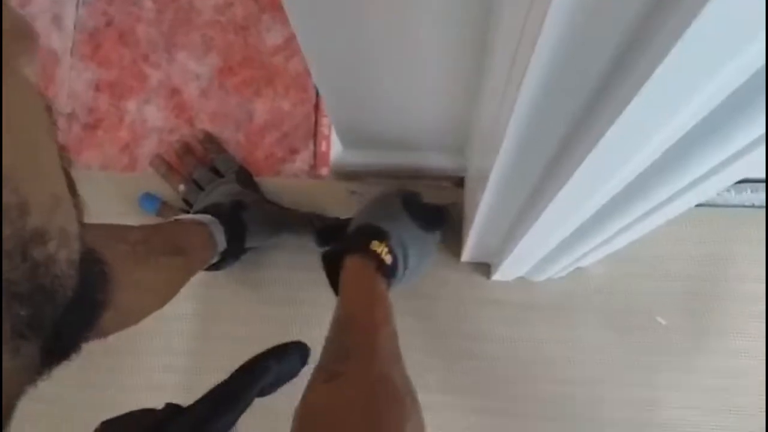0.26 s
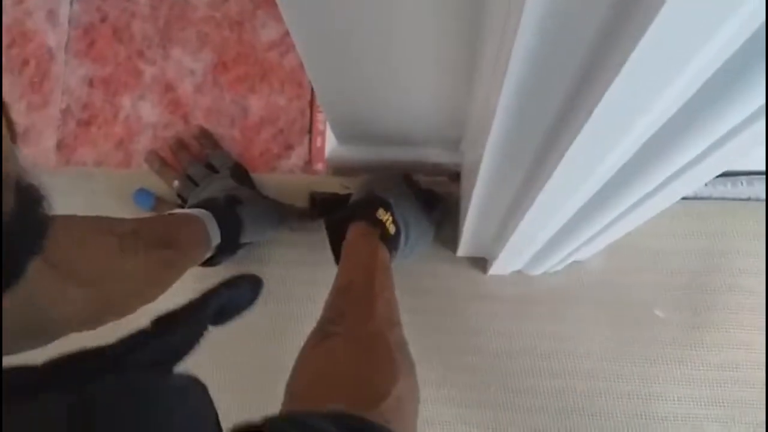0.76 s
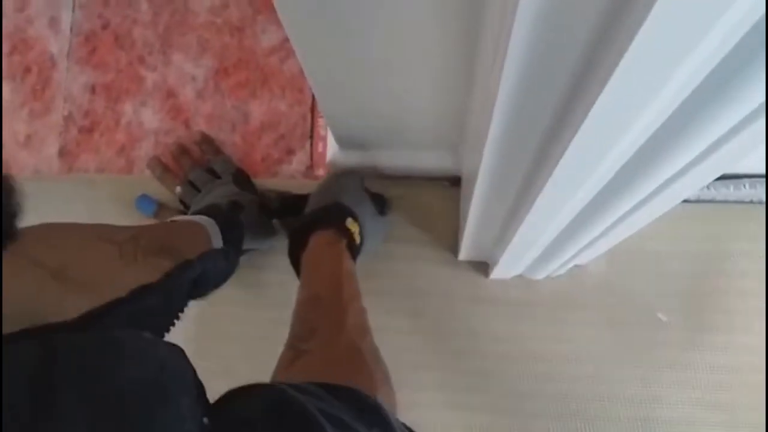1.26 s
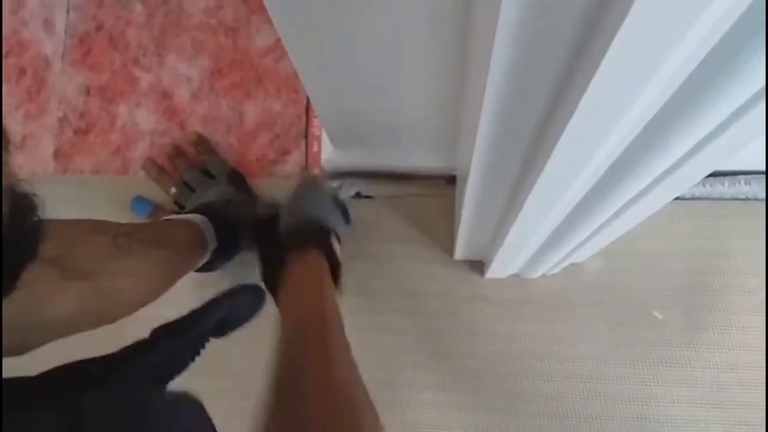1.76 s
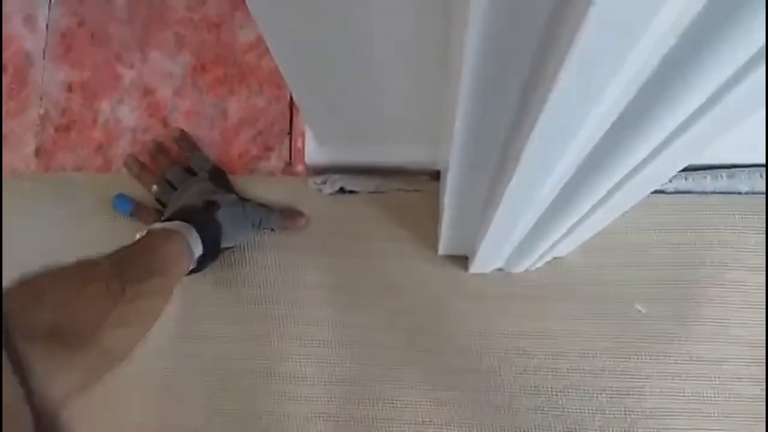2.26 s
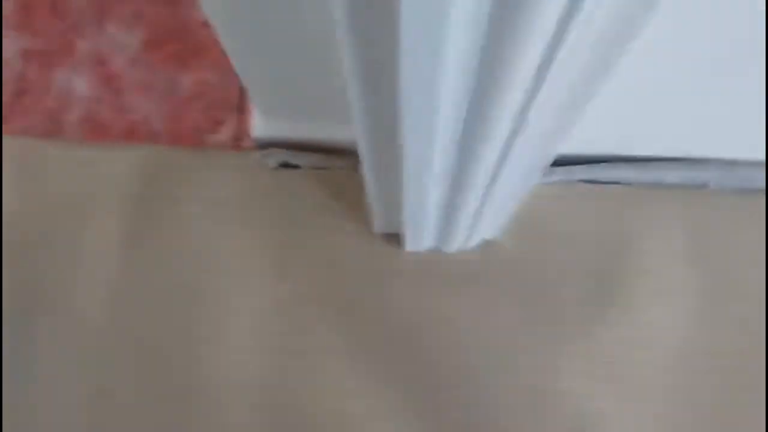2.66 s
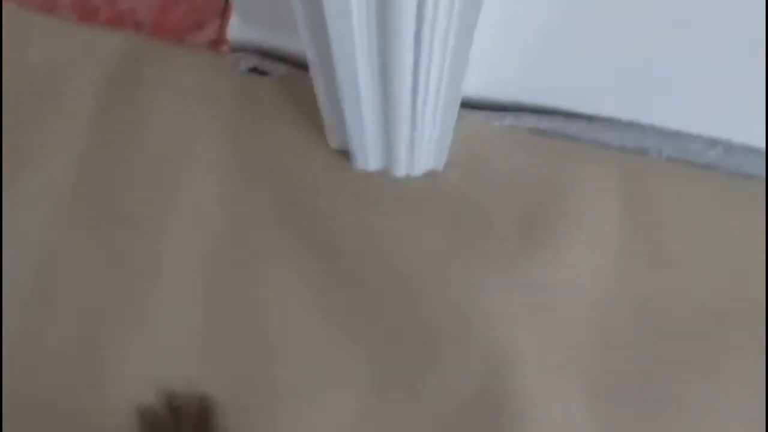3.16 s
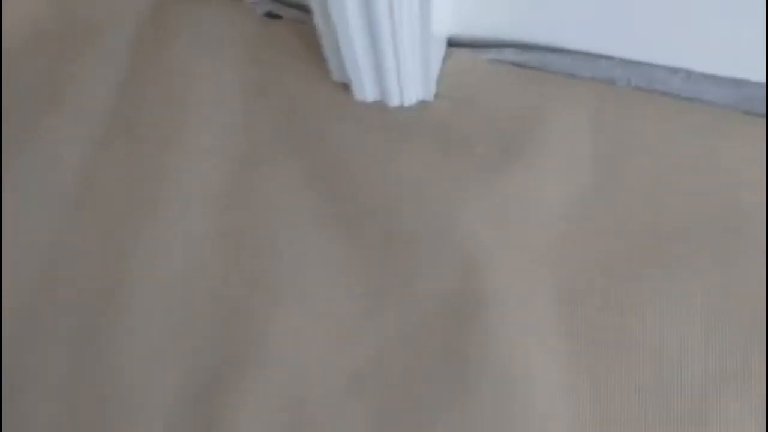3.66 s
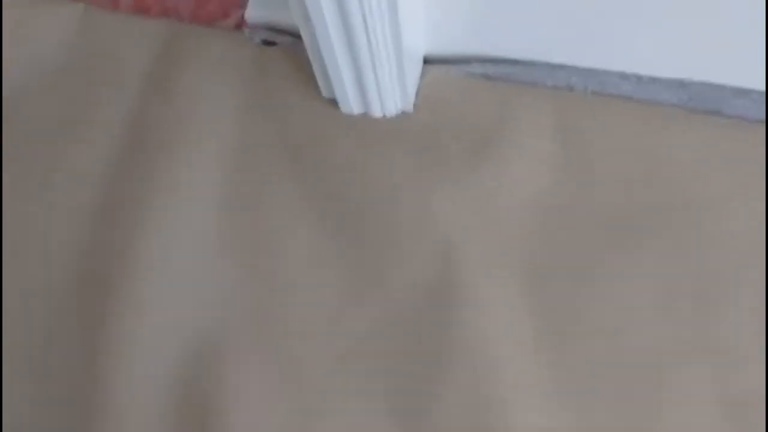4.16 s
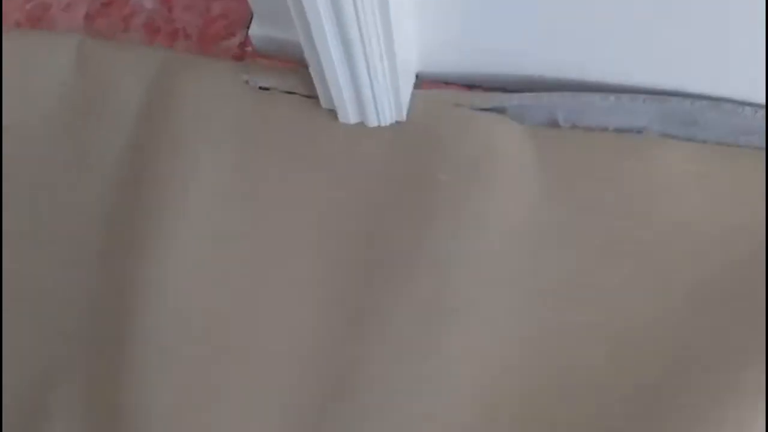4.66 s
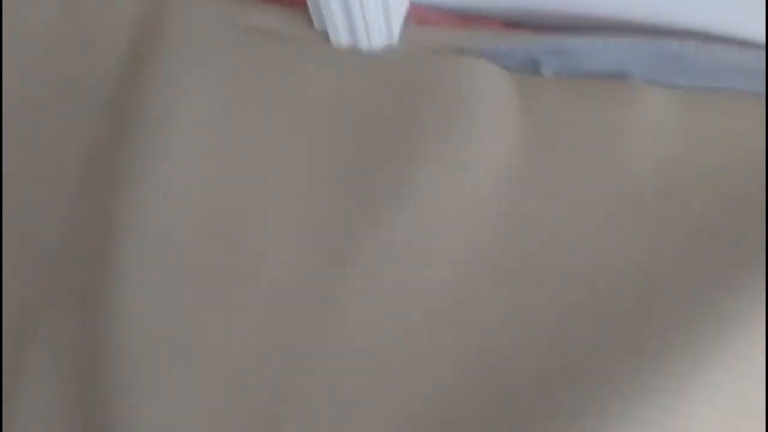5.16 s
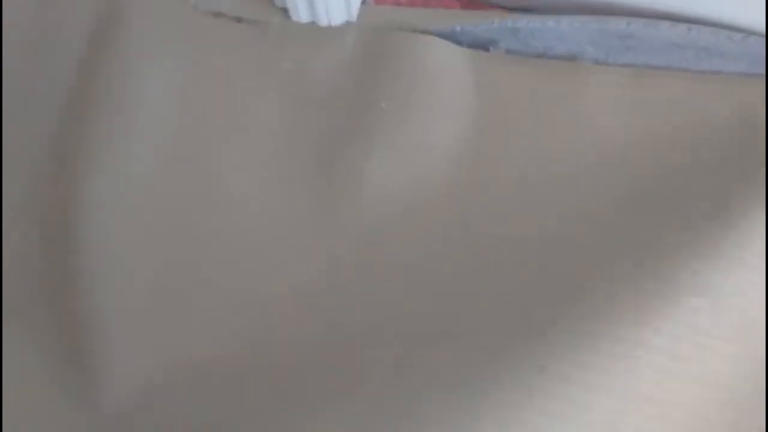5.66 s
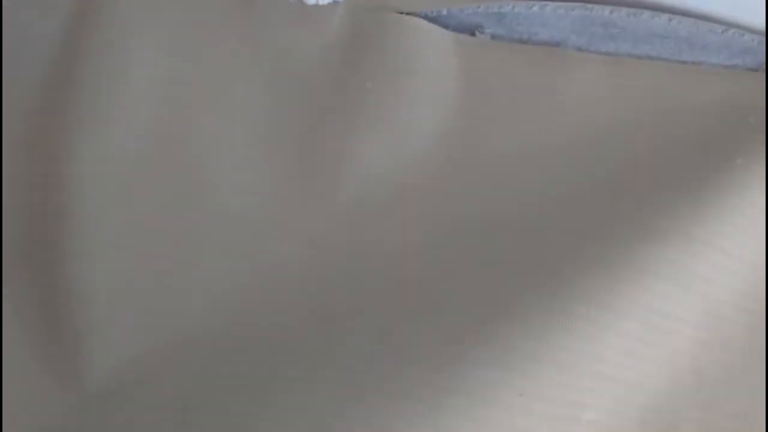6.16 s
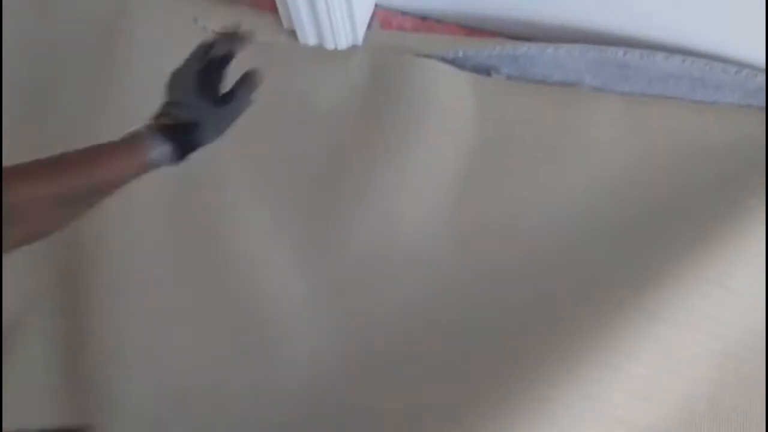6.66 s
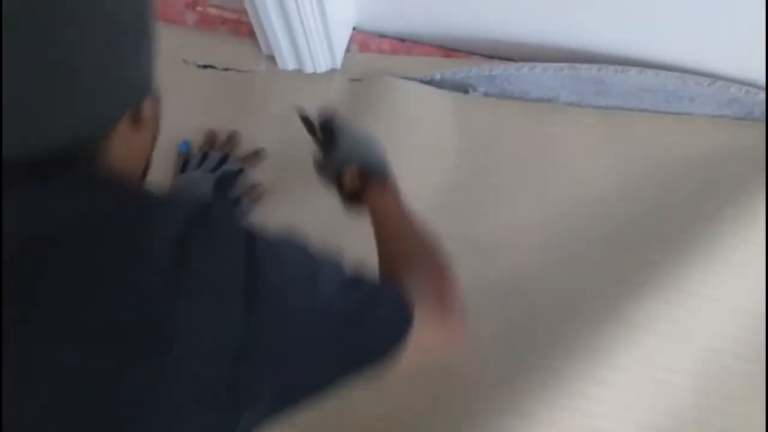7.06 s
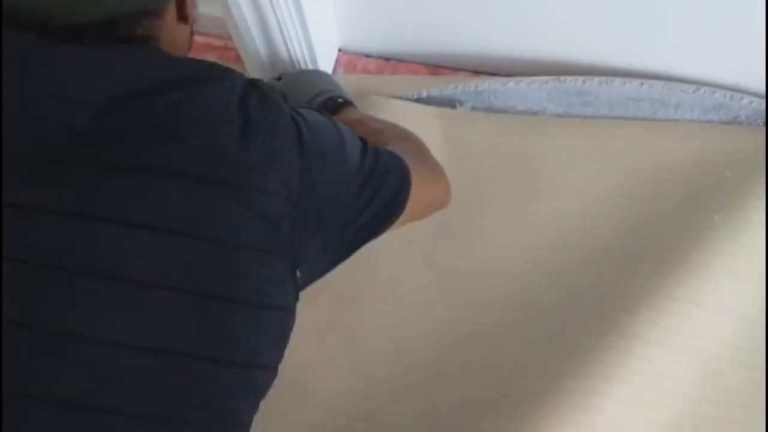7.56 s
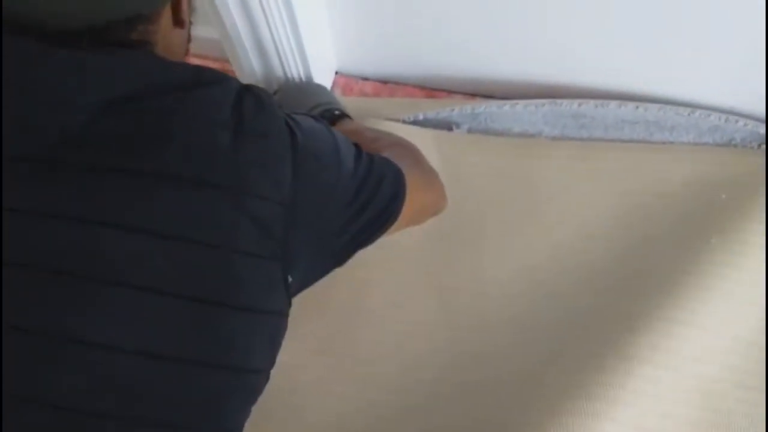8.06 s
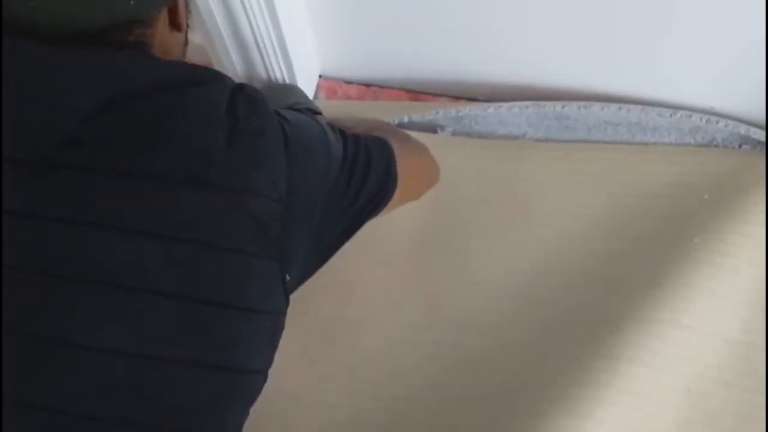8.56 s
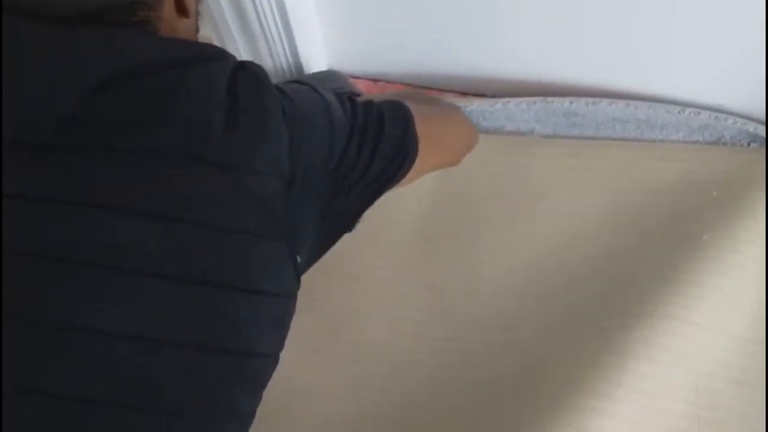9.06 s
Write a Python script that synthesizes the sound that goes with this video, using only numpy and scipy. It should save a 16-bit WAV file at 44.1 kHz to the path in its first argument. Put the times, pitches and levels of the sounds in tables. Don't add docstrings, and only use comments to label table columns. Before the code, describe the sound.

One near microphone picks up carpet being worked by hand over hollow floorboards. Dry snaps and fibre ticks come first, then a harsh rip and broad brushing stroke, fading folds and a low, weighty pull. One sharp, dominant wooden knock echoes off bare walls. Faint rustles follow before scratchy tucks build to hard shoves, over faint rumble and hiss.

```python
import sys
import numpy as np
from scipy import signal
from scipy.fft import rfft, irfft, next_fast_len
from scipy.io import wavfile
from scipy.ndimage import uniform_filter1d

SR = 44100
rng = np.random.default_rng(int(sys.argv[2]) if len(sys.argv) > 2 else 0)


def invert_db(level):
    return 10 ** (np.asarray(level, dtype=float) / 20)


def store_wav(level_fs):
    pcm = np.round(np.clip(np.atleast_2d(level_fs), -1, 1) * 32767)
    wavfile.write(sys.argv[1], SR, pcm.T.astype(np.int16))


N = 411012

# peak, rise and fall in seconds, pile scrape in dB, board weight in dB.
CUTS = [
    (0.912, 0.023, 0.15, -37.5, -40),
    (0.97, 0.066, 0.21, -47, -44),
    (1.085, 0.11, 0.17, -39.5, -51),
    (1.165, 0.15, 0.073, -46, -39),
    (1.27, 0.052, .08, -56.5, -56),
    (1.372, 0.096, 0.088, -39.5, -40.5),
    (1.535, 0.081, 0.12, -42, -41.5),
]
# peak, rise and fall in seconds, pile scrape in dB, board weight in dB.
SWEEPS = [
    (2.916, 0.012, 0.069, -28, -55),
    (2.958, 0.076, 0.14, -25.5, -44),
    (3.06, 0.14, 0.15, -32.5, -44.5),
    (3.4, 0.72, 0.46, -55, -72),
    (3.91, 0.04, 0.098, -36, -53),
]
# peak, rise and fall in seconds, pile scrape in dB, board weight in dB.
RIPS = [
    (2.535, 0.083, 0.098, -41.5, -51.5),
    (2.685, 0.029, 0.26, -31, -44.5),
    (2.75, 0.068, 0.06, -26.5, -47),
    (3.565, 0.072, 0.083, -40, -47),
    (5.165, 0.035, 0.133, -44.5, -49.5),
    (5.6, 0.082, 0.12, -42.5, -47.5),
    (5.85, .012, 0.27, -47, -68),
]
# peak, rise and fall in
# seconds, # pile scrape in dB, board weight in dB.
FOLDS = [(0.0, .01, 0.13, -46.5, -42), (2.18, 0.24, .1, -79.5, -71), (3.5, 0.11, 0.13, -48.5, -59),
         (3.8, 0.043, 0.37, -50, -68), (3.884, 0.034, 0.19, -41.5, -57), (4.08, 0.38, 0.24, -53, -56),
         (4.23, 0.27, 0.18, -45.5, -63), (4.43, 0.079, 0.26, -49.5, -46.5), (5.98, 0.2, 0.16, -48.5, -75),
         (6.27, 0.11, 0.064, -65.5, -52.5), (6.75, 0.66, 0.8, -60.5, -84)]
# peak, rise and fall in seconds, pile scrape in dB, board weight in dB.
RUSTLES = [(1.8, 0.089, 0.248, -70, -92), (2.04, 0.12, 0.2, -64, -78), (7.56, 0.18, 0.14, -71, -102),
           (7.755, 0.061, 0.086, -72.5, -67), (7.9, 0.2, 0.17, -75, -87), (7.985, 0.059, .1, -70, -66.5),
           (8.27, .15, 0.23, -67, -70.5), (8.4, 0.13, 0.41, -65.5, -80)]
# peak, rise and fall in seconds, pile scrape in dB, board weight in dB.
DRAGS = [
    (4.55, 0.1, .2, -40, -33),
    (4.74, 0.28, 0.29, -42.5, -37),
    (5.03, 0.13, 0.18, -42, -34.5),
    (5.13, 0.17, 0.048, -48, -52),
    (5.34, 0.063, 0.085, -43.5, -37),
    (5.42, 0.18, 0.095, -46.5, -35.5),
]
# peak, rise and fall in seconds, pile scrape in dB, board weight in dB.
BRUSHES = [(2.265, 0.084, 0.14, -61, -70), (2.33, 0.022, 0.3, -66, -69.5), (3.74, 0.25, 0.063, -52, -65),
           (4.92, 0.014, .15, -41.5, -60), (5.78, 0.14, 0.18, -53, -69), (6.25, 0.29, 0.22, -49.5, -56),
           (6.4, 0.22, .2, -56.5, -71.5), (6.53, 0.14, .22, -44.5, -60.5), (7.2, 0.38, 0.33, -59.5, -69),
           (7.4, 0.29, 0.23, -62, -74.5)]
# peak, rise and fall in seconds, pile scrape in dB, board weight in dB.
TUCKS = [(8.075, 0.035, 0.15, -57, -88), (8.135, 0.08, 0.087, -53.5, -75), (8.542, 0.019, 0.079, -62, -51),
         (8.585, 0.025, 0.28, -46.5, -49.5), (8.678, 0.02, 0.091, -39.5, -43.5),
         (8.783, .012, 0.1, -45, -52), (8.9, 0.043, 0.23, -50, -49), (9.0, 0.22, 0.15, -44, -44.5),
         (9.07, 0.052, 0.091, -49, -62)]
# peak, rise and fall in seconds, pile scrape in dB, board weight in dB.
SHOVES = [
    (9.108, 0.01, 0.14, -31.5, -37),
    (9.18, 0.13, 0.088, -32, -35.5),
    (9.285, 0.062, .2, -31.5, -32.5),
]
# peak, rise and fall in seconds, pile scrape in dB, board weight in dB.
SHIFTS = [(0.49, 0.13, 0.07, -87, -61.5), (1.09, 0.11, 0.15, -62, -47.5), (2.64, 0.14, .15, -80, -46.5),
          (3.365, 0.12, 0.088, -95, -48.5), (3.58, 0.16, 0.12, -79, -51), (4.25, 0.1, 0.08, -82, -51),
          (5.9, 0.034, 0.14, -96, -55.5), (5.12, 0.086, 0.14, -74, -39.5), (5.43, 0.099, 0.17, -79, -46),
          (8.8, 0.12, 0.12, -70, -47.5)]

# pitch in Hz, width in Hz, level in dB.
JOIST = [(74.6, 18, 0.5), (92, 22, 0.5)]
# pitch in Hz, width in Hz, level in dB.
BOARD = [(131.5, 37, 0), (197.2, 59.4, 0), (250, 50, -2), (305.6, 23, -1.5)]
# pitch in Hz, width in Hz, level in dB.
PANEL = [(175, 18, 0)]
# pitch in Hz, width in Hz, level in dB.
FLAP = [(350, 109, 3.5), (475, 96.5, 5.5), (546.6, 88, 3.5), (713, 135, 2.5), (800, 224, -2),
        (1285, 110, -5.5)]
# pitch in Hz, width in Hz, level in dB.
BLADE = [(2300, 290, 5), (3400, 210, -4.5), (4200, 330, -4), (6100, 910, 3)]
# frequency in Hz, density in dB per Hz.
FIBRE = [(500, -29.5), (850, -3), (1350, 2), (1560, -0.5), (2320, -2), (3610, -0.5), (8360, -8.5),
         (11000, -13.5), (11900, -16.5), (15500, -56.5), (22000, -120)]

# start in seconds, peak in dB, pitch in Hz, low part in dB, airy part in dB.
SNAPS = [(0.8871, -36, 3460, 0, -4), (0.905, -26, 6840, -3, -3.5), (1.3279, -28, 2600, 4, -1),
         (1.3601, -30, 3450, -15, -8), (1.3752, -30, 3400, -24, -4), (1.137, -34, 2800, -8, -25),
         (1.146, -37, 3200, -8, -14), (1.153, -34, 3800, -7, -14), (1.4888, -25, 3550, -25, -12),
         (1.4905, -29.5, 6260, -25, -15), (1.5155, -32, 3320, 2, -12), (1.6338, -37, 4200, -28, -14),
         (2.2568, -41.5, 3550, -11, -32), (2.3223, -39.5, 3580, -21, -34), (2.4798, -43, 2290, -10, -23),
         (2.651, -31, 5000, -11, -2), (2.6753, -24, 4900, -19, -4), (3.39, -37.5, 3570, -27, -16),
         (3.532, -35, 4040, 5, -16), (3.5576, -24.5, 4500, -11, -8), (3.7336, -32, 3760, -21, -15),
         (4.4228, -34, 4900, -4, -29), (5.3078, -35, 4200, -20, -18.5), (8.1209, -38, 5880, -20.5, -15.5),
         (8.3706, -52, 5630, -9, -12), (9.111, -29, 2200, -19, -15), (9.2665, -29, 2150, -12, -29)]
# start in seconds, peak in dB.
TICKS = [(0.9423, -28), (0.9634, -37), (0.9916, -37), (1.0206, -39), (1.041, -26), (1.052, -29),
         (1.0635, -33), (1.074, -24), (1.0844, -29), (1.096, -28), (1.1104, -26), (1.2496, -40),
         (1.2745, -43), (1.2884, -36), (1.293, -39), (1.3644, -23.5), (1.375, -34), (1.5155, -35),
         (1.5294, -37), (1.5544, -42), (1.5794, -46), (1.5, -38), (1.5102, -37), (1.5665, -44)]
# start in seconds, peak in dB, pitch in Hz.
CRACKS = [(0.9053, -25, 6830), (0.9114, -30, 7010), (1.0405, -27, 3730), (1.0974, -30, 3500),
          (1.3598, -28, 3390), (1.3644, -27, 3510), (1.3749, -24, 3430), (1.3804, -28, 4070),
          (1.4905, -26, 4470), (1.6332, -33, 6090), (2.4798, -39, 4120), (2.9474, -18, 2680),
          (5.8436, -32, 6580), (6.558, -34, 3160), (6.8845, -5, 3900), (8.7802, -31, 2290)]
# start in seconds, peak in dB, pitch in Hz, length in seconds.
SWISHES = [(2.672, -25, 4970, .05), (2.705, -21, 4200, 0.054), (2.735, -24, 3600, 0.041),
           (2.53, -40, 4200, 0.034), (2.93, -30, 6200, .08), (5.55, -44, 5500, .05), (7.49, -56, 5500, .13),
           (8.26, -60, 5600, 0.15)]
# start in seconds, peak in dB, pitch in Hz, length in seconds.
STREAKS = [(3.838, -43, 1590, 0.079), (3.851, -40, 950, .015), (3.858, -37.5, 530, 0.032),
           (3.878, -34, 2400, 0.048), (3.878, -36, 3400, 0.038), (3.88, -35, 3990, 0.046),
           (3.885, -35, 4700, .03), (3.885, -34, 606, 0.05), (3.925, -35.5, 577, 0.063),
           (2.905, -31, 830, 0.028), (2.93, -24.5, 1590, 0.062), (2.93, -25, 2690, 0.069),
           (2.93, -23, 3740, 0.086)]
# start in seconds, peak in dB, pitch in Hz, length in seconds.
LATE_STREAKS = [(5.935, -46, 1300, .1), (6.563, -47, 3200, .05), (9.11, -31, 2900, .1),
                (9.265, -29, 2900, .07), (8.79, -47, 6100, .08), (4.52, -37, 800, .05),
                (4.74, -37, 480, .07)]
# start in seconds, peak in dB, low spots in dB, t60 in seconds.
JERKS = [(8.5333, -53, 0, .04), (8.579, -34.5, 6, .06), (8.6146, -35, 0, .04), (8.674, -30, 2, .05),
         (8.6785, -32, 2, .07), (8.777, -35, 4, .04), (8.7815, -34, 1, .08), (8.858, -38, 8, .05),
         (8.8874, -39, 4, .05), (8.906, -40, 3, .05), (8.925, -38, 0, .05), (8.945, -36, -7, .05),
         (8.975, -42, 0, .05), (9.0, -41, 2, .05), (9.0117, -28.5, -2, 0.061), (9.03, -37, -2, .05),
         (9.0631, -34, 2, .06), (9.09, -41, 2, .05), (9.1079, -28, 6, .05)]
# pitch in Hz, width in Hz, level in dB.
BLADE_SPOTS = [(1860, 220, -4), (2400, 360, 2), (3400, 230, -8), (4310, 250, -14), (6080, 260, -3.5)]
# start in seconds, peak in dB, low and high spot in Hz, t60 in seconds.
SCRATCHES = [(8.0728, -51, 2986, 4900, 0.14)]
# start in seconds, peak in dB, pitch in Hz, t60 in seconds.
PINGS = [(5.153, -37.5, 3560, 0.32), (5.153, -39, 4100, .3), (5.156, -40, 4680, .35),
         (5.153, -46, 6280, 0.27), (5.842, -43, 2980, 0.3), (5.842, -43, 3670, .15),
         (5.842, -37, 5430, 0.25), (5.842, -38, 6580, 0.23), (5.842, -40, 7470, .2),
         (6.558, -45, 3163, .22), (6.557, -46, 2750, .06), (6.558, -41, 3620, .08), (6.557, -41, 5240, .06),
         (8.12, -42, 5880, 0.29), (8.12, -48, 5000, 0.16), (7.755, -63.5, 6200, 0.22),
         (8.675, -50, 6100, 0.12), (8.778, -44.5, 6100, 0.24), (9.005, -40, 5900, .3),
         (5.153, -46, 7800, .25), (5.155, -46, 8700, .3), (5.155, -50, 10300, .25), (5.842, -46, 8520, .25),
         (8.95, -44, 4310, .4), (8.58, -42, 3430, .1), (8.78, -42, 3430, .12), (2.2568, -53, 5200, .06),
         (2.3223, -51, 5300, .08), (6.928, -26, 455, .25)]
# start in seconds, peak in dB, pitch in Hz,
# t60 in seconds.
THUDS = [(2.598, -39.5, 150, 0.093), (5.298, -40, 170, 0.065), (8.537, -38, 139, 0.14),
         (9.102, -25, 153, 0.16), (9.215, -22, 151, 0.093), (9.262, -29, 173, 0.087),
         (6.8862, -6, 118, .055), (6.94, -16.5, 98, .2), (8.529, -39, 140, .12), (9.09, -30, 170, .08),
         (7.74, -56, 150, .15), (8.3, -56, 160, .1), (6.23, -45, 290, .08), (6.272, -45, 280, .07),
         (5.885, -48, 200, .07)]
# start in seconds, peak in dB, pitch in Hz, length in seconds.
SURGES = [(4.522, -27, 173, .065), (4.578, -31, 174, .05), (4.628, -31, 176, .06), (5.31, -28.5, 177, .05),
          (5.385, -36, 172, .07), (4.98, -37, 180, .05), (5.11, -37, 305, .05), (6.922, -20, 452, .04),
          (6.975, -34, 452, .06)]

# start in seconds, body in dB, crack in dB.
KNOCK = [
    (6.878, -19.5, -18),
    (6.8832, -26, -11),
    (6.8846, -4, -12),
    (6.8913, -23, -16),
    (6.931, -24, -23),
]
# pitch in Hz, level in dB,
# t60 in seconds.
KNOCK_MODES = [(95.2, -13, 0.55), (145, -12, .3), (274, -13.5, 0.2), (375, -12, 0.2), (419, -18, 0.2),
               (451, -17, 0.3), (560, -5.5, 0.063), (717, -18, 0.35), (794, -10, .2), (823, -2.5, 0.061),
               (900, -22, 0.41), (936, -24, 0.2),
               (117, -17, 0.083), (180, -1, 0.1)]
# frequency in Hz, density in dB per Hz.
KNOCK_TAIL = [(29, -54), (50, -31), (87, 0.5), (296, -14), (459, -6), (528, -14), (857, -14), (1180, -24.5),
              (4740, -26), (10600, -36), (11800, -41.5), (12500, -89.5), (16200, -118), (22000, -120)]
# frequency in Hz, t60 in seconds.
ROOM_T60 = [(60, 0.57), (200, 0.53), (2000, 0.46), (10000, 0.36)]
# frequency in Hz, density in dB per Hz.
QUIET = [(18, -45), (30, -19), (103, 7), (244, -13.5), (298, -13), (605, -21.5), (1200, -17.5), (1880, -24),
         (4220, -22.5), (6170, -24), (9230, -33.5), (11000, -29), (12500, -52.5), (16200, -80),
         (22000, -120)]
QUIET_DB, ROOM_DB = -66.5, -10
CUTOFF_HZ = 12100


def handling():
    *powers, tilt_db, crackle = all_movements()
    scrape = powers[4]
    controls = [*np.sqrt(powers), tilt_db / scrape, crackle / scrape]
    on_joist, on_board, on_panel, on_flap, on_fibre, on_blade, tilt_db, crackle = (
        np.interp(np.arange(N) / 64, np.arange(len(c)), c) for c in controls)
    jolts = friction(0.58, 250, spread_db=3.0, clump_db=3, clump_hz=23.0)
    rub = friction(crackle, 1500, spread_db=3.0, clump_db=6, clump_hz=40.5)
    catches = friction(0.63, 700, spread_db=8.5, clump_db=7.5, clump_hz=18)
    joist = rms_one(resonate(resonate(jolts, JOIST), [(89.6, 110, 0)]))
    board = rms_one(resonate(resonate(jolts, BOARD), [(195, 490, 0)]))
    panel = rms_one(resonate(resonate(rng.standard_normal(N), PANEL), PANEL))
    panel = rms_one(panel / (0.46 + np.sqrt(uniform_filter1d(panel ** 2, size=800))))
    flap = rms_one(resonate(resonate(rub + 0.56 * rms_one(jolts), FLAP), [(699, 1440, 0)]))

    def fibre_gain(hz):
        return invert_db(tilt_db * np.log2(hz / 3500) + 2.0 * drift(12) + 1.2 * drift(1.0))

    fibre = rms_one(bands(rub, FIBRE, fibre_gain))
    blade = rms_one(resonate(resonate(catches, BLADE), BLADE))
    floor = on_joist * joist + on_board * board + on_panel * panel
    return floor + on_flap * flap + on_fibre * fibre + on_blade * blade


def all_movements():
    return sum([
        movements(CUTS, rounded=0.97, flap_db=-1.5, joist_db=-17, blade_db=-24,
                  panel_db=-4, tilt_db=0.5, crackle=0.9),
        movements(SWEEPS, rounded=1.59, flap_db=-2, joist_db=-15, blade_db=-30,
                  panel_db=-29, tilt_db=0, crackle=0.22),
        movements(RIPS, rounded=1.21, flap_db=-5.5, joist_db=-7.5, blade_db=-35,
                  panel_db=-31, tilt_db=2.2, crackle=0.35),
        movements(FOLDS, rounded=1.1, flap_db=4, joist_db=-9, blade_db=-31,
                  panel_db=-20, tilt_db=-1, crackle=0.22),
        movements(RUSTLES, rounded=1.3, flap_db=-8, joist_db=-2, blade_db=-29,
                  panel_db=-8, tilt_db=6, crackle=0.25),
        movements(DRAGS, rounded=1.53, flap_db=-2, joist_db=-7.5, blade_db=-32,
                  panel_db=1, tilt_db=-2, crackle=0.054),
        movements(BRUSHES, rounded=1, flap_db=-1.5, joist_db=-6, blade_db=-30,
                  panel_db=-16.5, tilt_db=1, crackle=0.17),
        movements(TUCKS, rounded=1.2, flap_db=-2, joist_db=-6, blade_db=-7.5,
                  panel_db=-1, tilt_db=-0.5, crackle=0.13),
        movements(SHOVES, rounded=1.37, flap_db=-2.5, joist_db=-6, blade_db=-9.5,
                  panel_db=-4.5, tilt_db=-1, crackle=0.41),
        movements(SHIFTS, rounded=0.92, flap_db=10.5, joist_db=0, blade_db=-27,
                  panel_db=-27, tilt_db=-1, crackle=0.19)])


def movements(rows, rounded, flap_db, joist_db, blade_db, panel_db, tilt_db, crackle):
    t = np.arange(0, N + 64, 64) / SR
    s, rise, fall, scrape_db, weight_db = np.transpose(rows)[:, :, None]
    away = np.where(t < s, (s - t) / rise, (t - s) / fall)
    shape_db = -np.minimum(20 * away ** rounded, 120)
    between_db = weight_db + 0.45 * (scrape_db - weight_db) + flap_db
    scrape, weight, flap = (invert_db(2 * (db + shape_db)).sum(axis=0) for db in (scrape_db, weight_db, between_db))
    drone = 1 / (1 + invert_db(-2 * panel_db))
    return np.array([weight * invert_db(2 * joist_db), weight * (1 - drone), weight * drone, flap, scrape,
                     scrape * invert_db(2 * blade_db), scrape * tilt_db, scrape * crackle])


def friction(crackle, per_s, spread_db, clump_db, clump_hz):
    sizes = invert_db(spread_db * np.minimum(rng.exponential(1, N), 4)) * rng.choice([-1, 1], N)
    chance = per_s * invert_db(clump_db * drift(clump_hz)) / SR
    slips = rms_one(sizes * (rng.random(N) < chance))
    share = np.clip(crackle, 0, 1)
    return np.sqrt(share) * slips + np.sqrt(1 - share) * rng.standard_normal(N)


def snap(t, noise, hz, low_db, air_db):
    decay = invert_db(-60 * t / 0.0094) + invert_db(-10.5 - 60 * t / 0.115)
    burst = noise * np.minimum(t / 0.00094, 1) * decay
    return resonate(burst, [(900, 900, low_db + 4.5), (hz, 0.24 * hz, 0), (9500, 4000, air_db)])


def tick(t, noise):
    return resonate(noise * np.exp(-t / 0.0009), [(4000, 2000, -18), (9700, 5800, 4.0)])


def crack(t, noise, hz):
    return resonate(noise * np.exp(-t / 0.0007), [(hz, 0.8 * hz, 0), (1.8 * hz, 3500, -6)])


def swish(t, noise, hz, length):
    spot = [(hz, 0.42 * hz, 0)]
    swell = np.sin(np.pi * np.minimum(t / (1.46 * length), 1)) ** 2
    return resonate(resonate(noise, spot), spot) * swell


def streak(t, noise, hz, length):
    spot = [(hz, 60 + 0.079 * hz, 0)]
    tone = resonate(resonate(noise, spot), spot)
    tone = tone / (.4 * tone.std() + np.sqrt(uniform_filter1d(tone ** 2, size=400)))
    return tone * np.minimum(t / (0.22 * length), 1) * invert_db(-15 * (t / length) ** 2)


def jerk(t, noise, low_db, t60):
    decay = invert_db(-60 * t / 0.012) + invert_db(-8.0 - 60 * t / t60)
    slip = noise * np.minimum(t / 0.0006, 1) * decay
    spots = [(hz, width, db + low_db * (hz < 4000)) for hz, width, db in BLADE_SPOTS]
    open_spots = [(hz, 2 * width, 0) for hz, width, db in BLADE_SPOTS]
    return resonate(resonate(slip, spots), open_spots) + resonate(slip, [(4000, 9000, -19)])


def scratch(t, noise, low_hz, high_hz, t60):
    rough = noise * abs(noise[::-1]) * np.minimum(t / 0.0018, 1) * invert_db(-60 * t / t60)
    middle_hz = .63 * low_hz + 0.34 * high_hz
    spots = [(low_hz, 550, 0), (middle_hz, 400, -3.5), (high_hz, 600, -1.5)]
    contact = resonate(noise * invert_db(-60 * t / 0.044), [(4500, 11000, -10.5)])
    return resonate(resonate(rough, spots), spots) + contact


def ping(t, noise, hz, t60):
    spot = [(hz, 60 + 0.07 * hz, 0)]
    decay = invert_db(-60 * t / 0.017) + invert_db(-3.5 - 60 * t / t60)
    rattle = noise * np.minimum(t / 0.001, 1) * decay
    return resonate(resonate(rattle, spot), spot)


def thud(t, noise, hz, t60):
    notes = -np.sin(2 * np.pi * hz * t) + 0.35 * np.sin(2 * np.pi * 1.9 * hz * t + noise[0])
    notes = notes * np.minimum(t / 0.0017, 1) * invert_db(-60 * t / t60)
    return signal.sosfilt(signal.butter(2, 55, "high", fs=SR, output="sos"), notes)


def surge(t, noise, hz, length):
    swell = (t / length) * np.exp(-(t / (0.55 * length)) ** 1.6)
    return np.sin(2 * np.pi * hz * t + noise[0]) * swell


def knock():
    push, sharp = np.full((2, N), 1e-18)
    for s, body_db, crack_db in KNOCK:
        push[round(s * SR)] = -invert_db(body_db)
        sharp[round(s * SR)] = invert_db(crack_db)
    out = np.zeros(N)
    for hz, db, t60 in KNOCK_MODES:
        r, w = invert_db(-60 / (t60 * SR)), 2 * np.pi * hz / SR
        out += invert_db(db - 6.5) * signal.lfilter([0, np.sin(w)], [1, -2 * r * np.cos(w), r * r], push)
    out = signal.sosfilt(signal.butter(2, 1300, fs=SR, output="sos"), out)
    fade = np.exp(-1 / (0.0022 * SR))
    envelope = signal.lfilter([1], [1, -fade], sharp)
    envelope = signal.lfilter([1 - .7], [1, -.7], envelope)
    hard = envelope * rng.standard_normal(N)
    out += invert_db(-0.5) * resonate(hard, [(1790, 900, 2.5), (4200, 2800, 1.5), (7600, 3000, -19.5)])
    out[round(KNOCK[0][0] * SR):][:SR] += invert_db(7.5) * dying_noise(KNOCK_TAIL)
    return signal.sosfilt(signal.butter(3, 62, "high", fs=SR, output="sos"), out)


def room(x):
    echoes = dying_noise([(40, 0), (20000, 0)])
    echoes = echoes / np.sqrt(np.sum(echoes ** 2))
    return invert_db(ROOM_DB) * signal.fftconvolve(x, echoes)[:N]


def dying_noise(spectrum):
    since = np.arange(SR) / SR
    swell = np.minimum(since / .014, 1)
    return swell * bands(rng.standard_normal(SR), spectrum, lambda hz: invert_db(-60 * since / at_hz(ROOM_T60, hz)))


def quiet_room():
    hush = bands(rng.standard_normal(N), QUIET, lambda hz: invert_db(1.2 * drift(4.1)))
    return invert_db(QUIET_DB) * rms_one(hush)


def bursts(events, shape):
    out, t = np.zeros(N + 9000), np.arange(9000) / SR
    for s, db, *columns in events:
        burst = shape(t, rng.standard_normal(len(t)), *columns)
        out[round(s * SR):][:len(t)] += invert_db(db) * burst / abs(burst).max()
    return out[:N]


def resonate(x, peaks):
    out = 0
    for k, (hz, width, db) in enumerate(peaks):
        r = np.exp(-np.pi * width / SR)
        top = (1 - r * r) / 2 * invert_db(db) * (-1) ** k
        out = out + signal.lfilter([top, 0, -top], [1, -2 * r * np.cos(2 * np.pi * hz / SR), r * r], x)
    return out


def bands(x, spectrum, gain):
    size = next_fast_len(len(x))
    hz = np.maximum(np.fft.rfftfreq(size, 1 / SR), 1)
    coloured = rfft(x, size) * invert_db(at_hz(spectrum, hz))
    out = 0
    for centre in 32 * 2 ** (np.arange(19) / 2):
        mask = np.cos(np.pi / 2 * np.clip(2 * np.log2(hz / centre), -1, 1)) ** 2
        if at_hz(spectrum, centre) > -55:
            out = out + gain(centre) * irfft(coloured * mask, size)[:len(x)]
    return out


def drift(rate):
    r = np.exp(-40 * np.pi * rate / SR)
    slow = signal.lfilter([1], [1, -2 * r, r * r], rng.standard_normal(N // 20 + 2002))[2000:]
    return np.interp(np.arange(N) / 20, np.arange(len(slow)), rms_one(slow))


def at_hz(points, hz):
    table_hz, values = np.transpose(points)
    return np.interp(np.log(hz), np.log(table_hz), values)


def rms_one(x):
    return x / np.sqrt(np.mean(x ** 2) + 1e-20)


def scene():
    work = handling()
    work = work + bursts(SNAPS, snap) + invert_db(-0.5) * bursts(TICKS, tick) + bursts(CRACKS, crack)
    work = work + bursts(SWISHES, swish) + bursts(STREAKS, streak) + bursts(LATE_STREAKS, streak)
    work = work + bursts(JERKS, jerk) + invert_db(5.0) * bursts(SCRATCHES, scratch) + bursts(PINGS, ping)
    work = work + bursts(THUDS, thud) + bursts(SURGES, surge)
    return (work + room(work) + knock() + quiet_room())[None]


def roll_off(x):
    return signal.sosfilt(signal.butter(12, 12840, fs=SR, output="sos"), x)


def record(dry):
    x = signal.sosfilt(signal.butter(2, 50, "high", fs=SR, output="sos"), dry)
    x = .85 * np.tanh(x / .85)
    x = signal.sosfilt(signal.cheby2(20, 45, CUTOFF_HZ, fs=SR, output="sos"), x)
    return roll_off(x)


dry = scene()
out = record(dry)
store_wav(out)
```